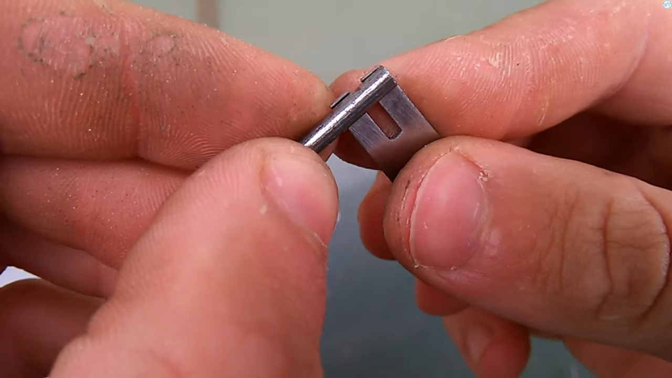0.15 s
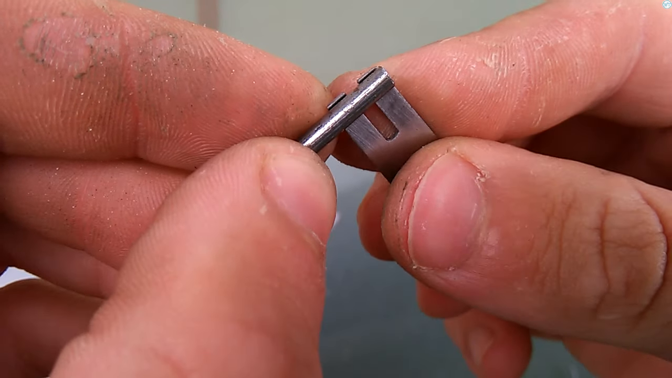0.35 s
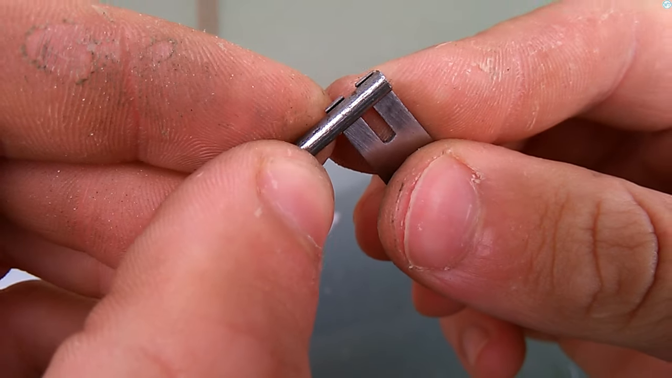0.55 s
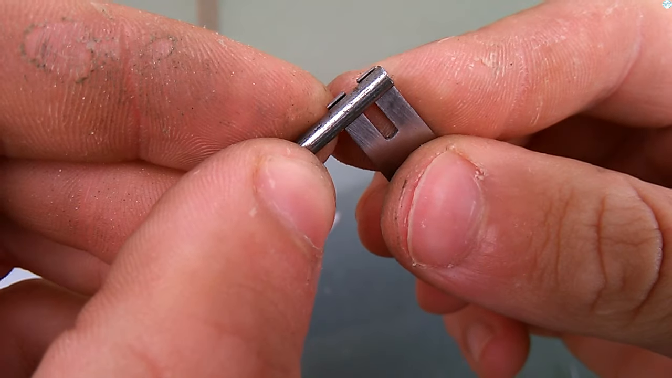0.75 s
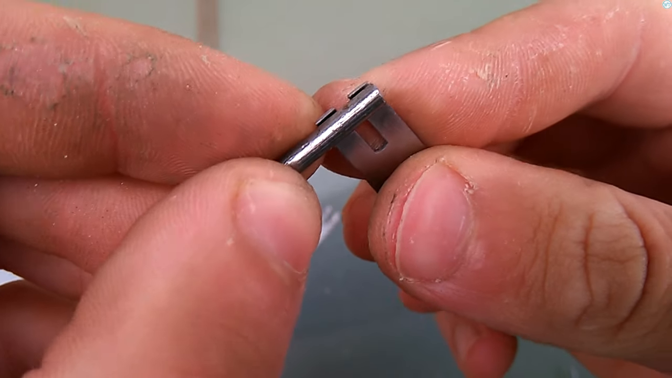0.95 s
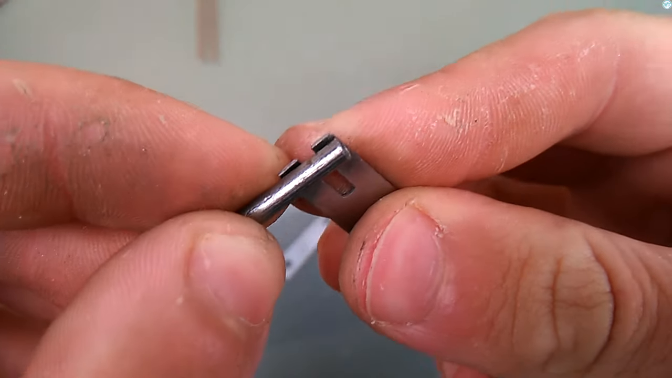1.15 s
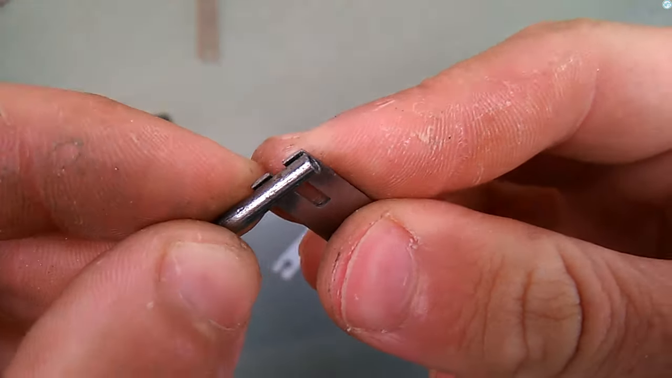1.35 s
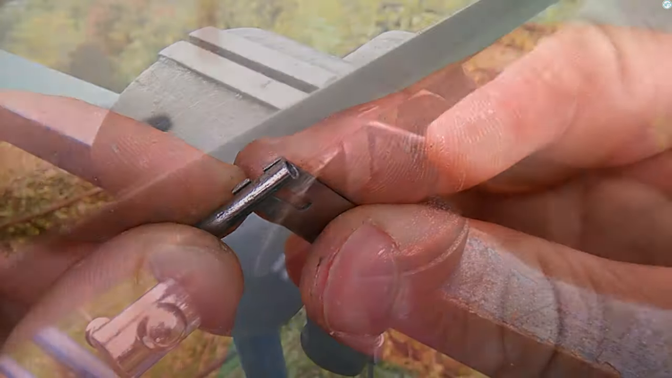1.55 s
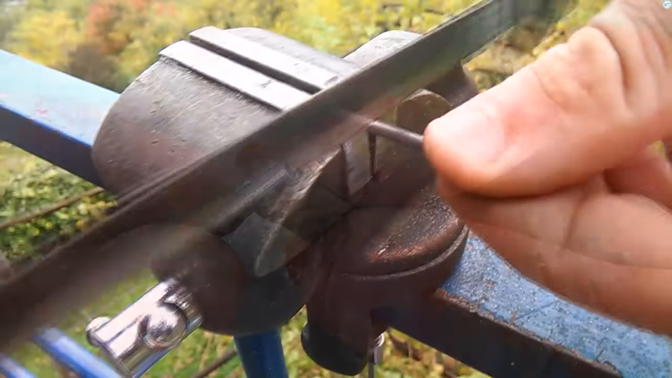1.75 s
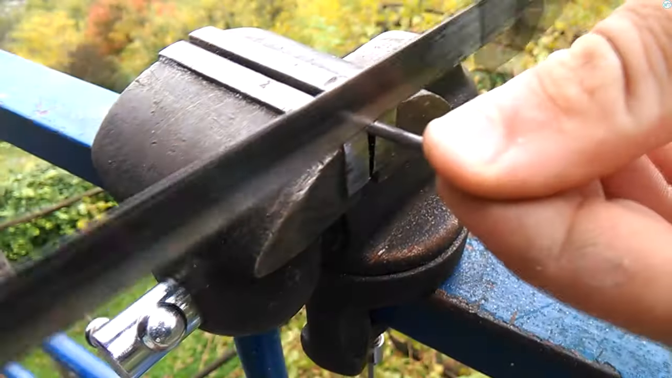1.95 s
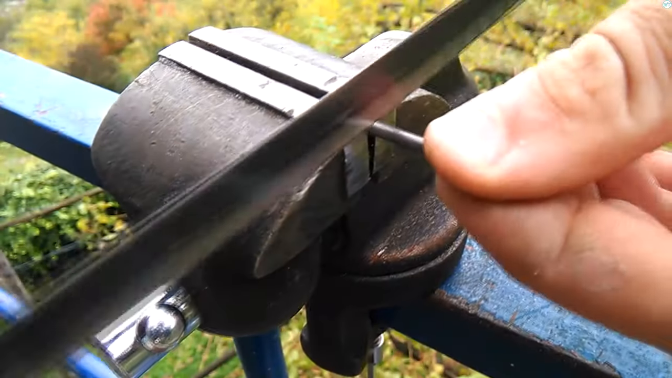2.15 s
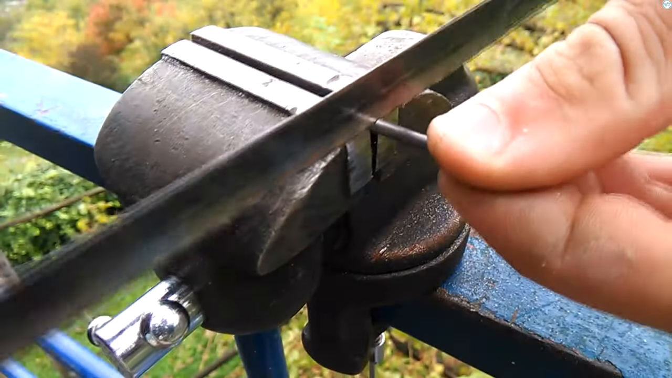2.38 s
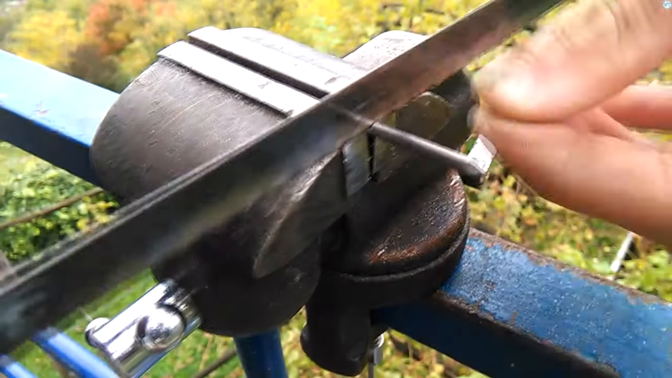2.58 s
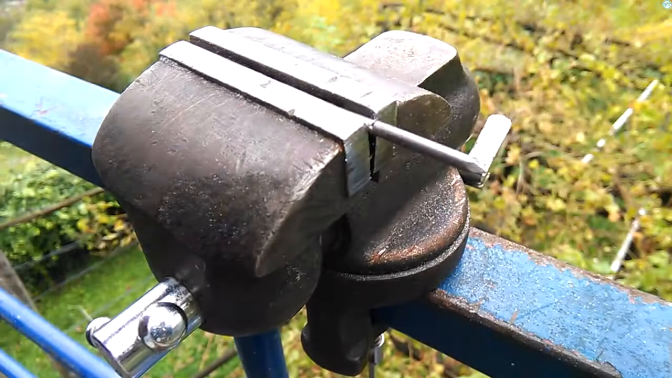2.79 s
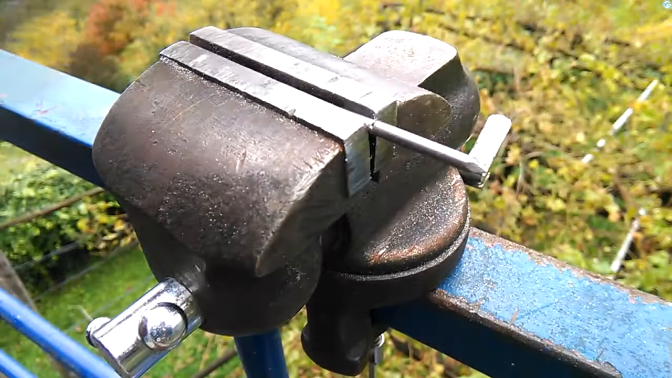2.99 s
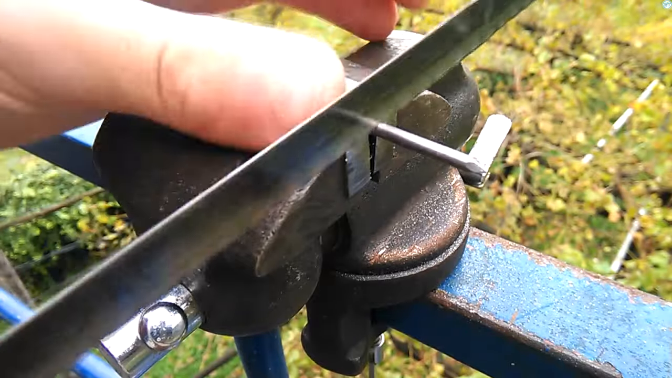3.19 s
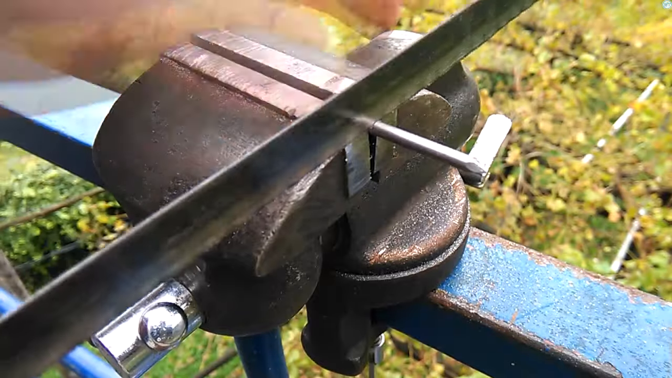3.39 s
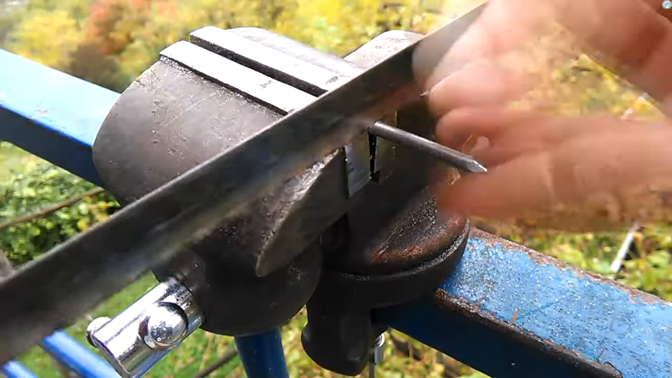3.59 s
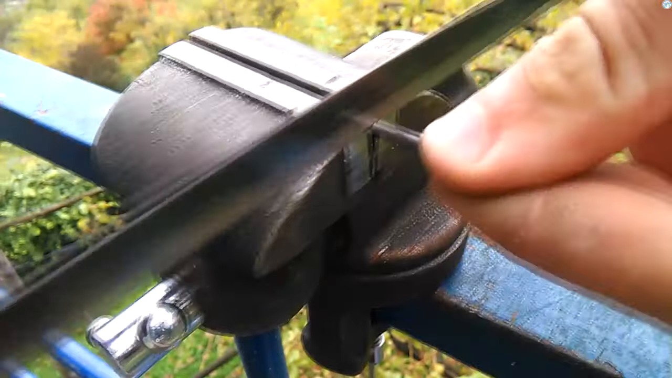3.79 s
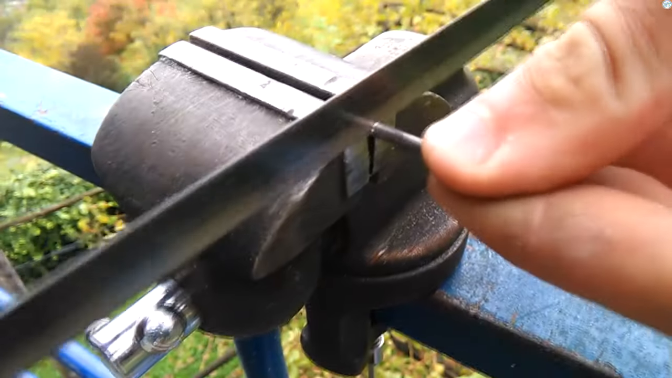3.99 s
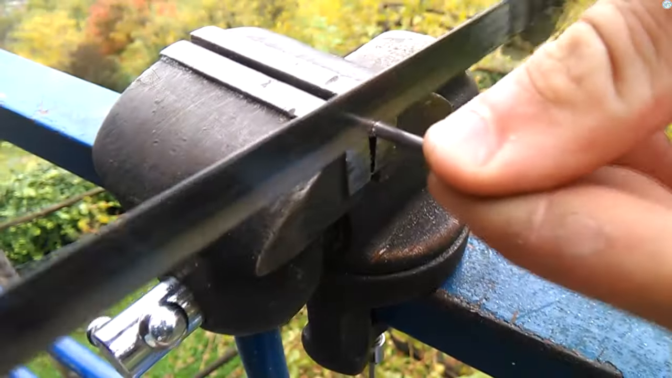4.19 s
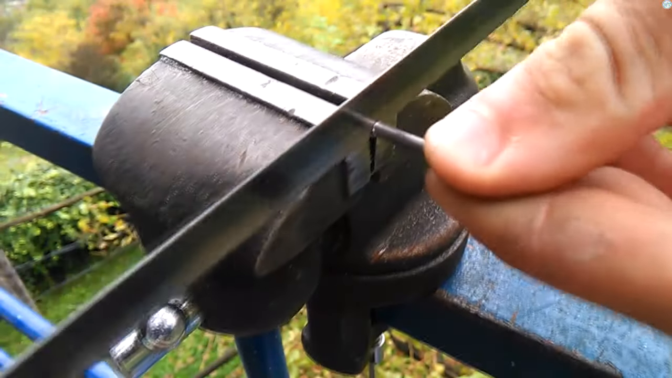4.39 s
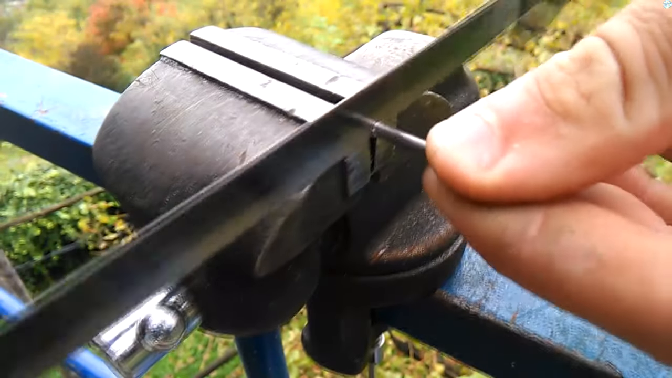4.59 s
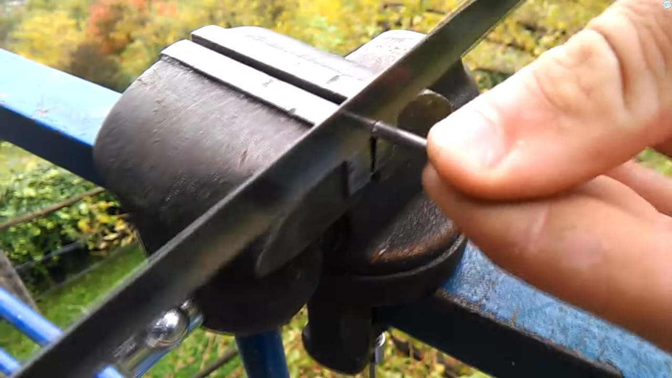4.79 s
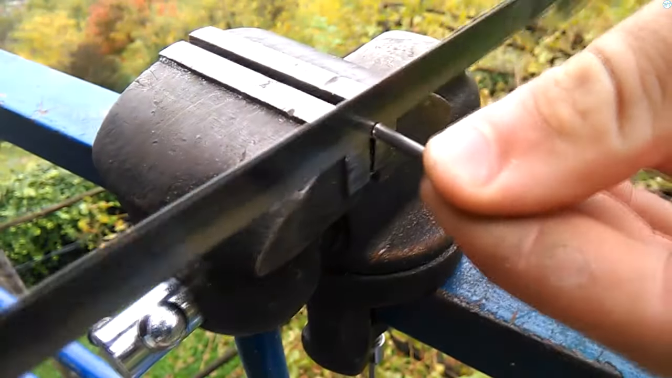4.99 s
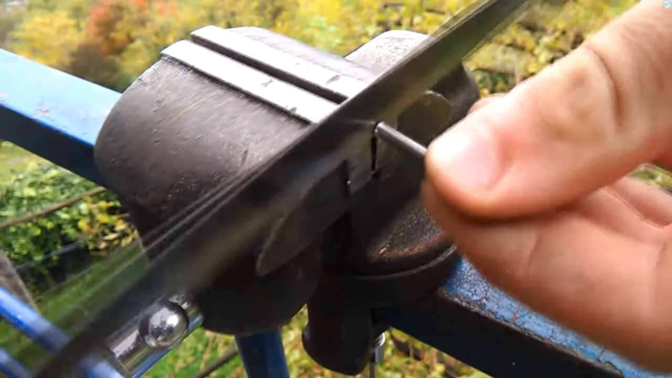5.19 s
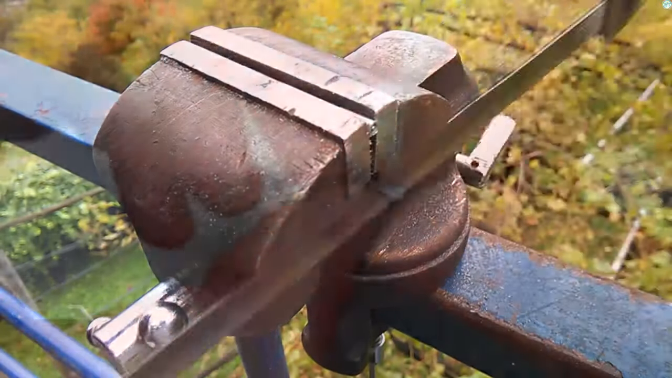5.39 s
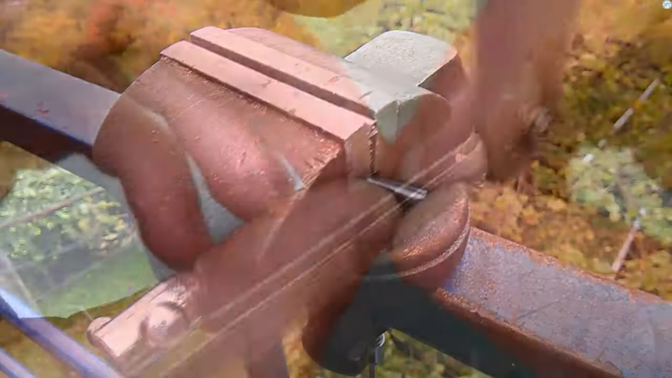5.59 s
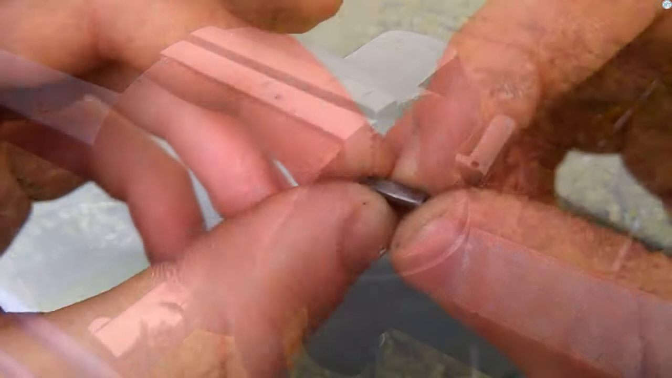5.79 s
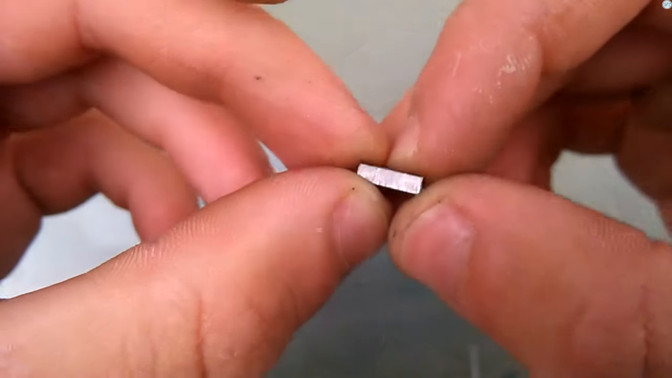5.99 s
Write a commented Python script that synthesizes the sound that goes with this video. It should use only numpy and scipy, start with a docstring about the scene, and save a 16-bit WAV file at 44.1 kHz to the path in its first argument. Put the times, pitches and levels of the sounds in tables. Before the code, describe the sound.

Quick hacksaw strokes scrape a steel rod in a vise, pause for light ticks, then resume longer and end in sharp metallic snags.

```python
"""A hacksaw cuts a thin steel rod in a bench vise. Air rumbles faintly on the microphone throughout, and a
low hum comes and goes. Then short, fast strokes begin, seven or eight to and fro a second: the impacts
of the teeth force blade, rod, vise and bench to vibrate. Light touches of steel follow, with one lone
stroke and a knock among them. In a longer second bout the bench knocks again and the blade snags as the
rod parts. Last come a dull knock and the stick-slip squeak of a fingertip."""
import sys
import numpy as np
from scipy import signal
from scipy.fft import rfft, irfft, next_fast_len
from scipy.io import wavfile
from scipy.ndimage import map_coordinates

SR = 44100
rng = np.random.default_rng(int(sys.argv[2]) if len(sys.argv) > 2 else 0)


def store_wav(level_fs):
    """Save 16-bit WAV to argv[1]."""
    pcm = np.round(np.clip(np.atleast_2d(level_fs), -1, 1) * 32767)
    wavfile.write(sys.argv[1], SR, pcm.T.astype(np.int16))


N = 266805


def amp(db):
    """Amplitude ratio of a level in decibels."""
    return 10 ** (np.asarray(db) / 20)


def unit(x):
    """Normalisation to rms 1."""
    return x / np.sqrt(np.mean(x ** 2) + 1e-20)


def at_level(sound, db, size):
    """Normalisation to the energy of size samples at this rms level."""
    return amp(db) * sound * np.sqrt(size / np.sum(sound ** 2))


def along(points, hz):
    """Interpolation of (f/Hz, value) points on a logarithmic frequency axis."""
    f, values = np.transpose(points)
    return np.interp(np.log(hz + 1), np.log(f + 1), values)


def read(rows, t):
    """Linear interpolation of every column of (t/s, ...) rows at time t."""
    times, *columns = np.transpose(rows)
    return [np.interp(t, times, column) for column in columns]


def curve(rows):
    """Envelope of (t/s, value) rows, one value per sample."""
    return read(rows, np.arange(N) / SR)[0]


def wobble(rate, size):
    """Smooth random modulation: a spline through rate knots a second."""
    knots = rng.standard_normal(int(size * rate / SR) + 4)
    return map_coordinates(knots, [np.arange(size) * rate / SR], mode="nearest")


def filtered(x, response):
    """Linear filtering by a complex frequency response, padded for the tail."""
    size = next_fast_len(len(x) + SR // 4)
    return irfft(rfft(x, size) * response(np.fft.rfftfreq(size, 1 / SR)), size)


def causal(gain):
    """Minimum-phase response of this gain: it rings only after a blow."""
    cepstrum = irfft(np.log(np.maximum(gain, 1e-6)))
    half = len(cepstrum) // 2
    return np.exp(rfft(cepstrum * np.r_[1, np.full(half - 1, 2), 1, np.zeros(half - 1)]))


def resonance(f, hz, width):
    """Response of a damped oscillator, with gain 1 at its centre."""
    return 1j * f * width / (hz * hz - f * f + 1j * f * width)


def noise(spectrum):
    """Stationary noise of this spectral shape, rms 1."""
    return unit(filtered(rng.standard_normal(N), lambda f: amp(along(spectrum, f)))[:N])


def dying_noise(decay):
    """Frequency-dependent damping: a noise burst of energy 1 decays exponentially in each band."""
    hz, t, bands = signal.stft(rng.standard_normal(SR // 2), SR, nperseg=128)
    tail = signal.istft(bands * np.exp(-np.log(1000) * t / along(decay, hz)[:, None]), SR)[1]
    return tail / np.linalg.norm(tail)


def add(track, start, sound):
    """Superposition of a sound on the track from start/s."""
    part = track[max(round(start * SR), 0):][:len(sound)]
    part += sound[:len(part)]


# Strength of the air flow: t/s, relative level/dB
WIND_LEVEL = [(0.0, -56.5), (1.58, -63), (2.04, -51), (2.59, -61), (2.63, -50), (2.96, -66), (3.67, -63),
              (4.08, -44), (4.43, -57), (4.89, -47), (5.46, -58), (6.05, -55)]
# Spectrum of its rumble: f/Hz, spectral level/dB
WIND_SPECTRUM = [(12, -3), (28, 0), (45, -6), (70, -13), (100, -28), (250, -45), (600, -120)]


def wind():
    """Pressure fluctuations of air moving over the microphone make a low rumble."""
    return amp(curve(WIND_LEVEL) + 3.5) * noise(WIND_SPECTRUM)


# Loudness of the surroundings: t/s, level/dB
AMBIENT_LEVEL = [(0, -57.5), (.6, -57.5), (1.5, -60), (3, -66), (3.7, -67), (5.5, -60), (6.05, -60)]
# Spectra of their dull murmur and of the hiss: f/Hz, spectral level/dB
MURMUR_SPECTRUM = [(30, -12), (70, 0), (130, -1), (220, -5), (300, -13), (400, -12), (520, -18),
                   (700, -20.5), (950, -19.5), (1200, -27), (2000, -34), (4000, -44), (8000, -62)]
HISS_SPECTRUM = [(300, 9), (1000, 8), (2000, 3), (3500, -1), (8000, -3), (12000, -5), (16000, -8)]


def ambience():
    """Amplitude-modulated noise: a dull murmur, and a faint hiss that partly follows its level."""
    level_db = curve(AMBIENT_LEVEL)
    murmur = amp(level_db + .7 * wobble(11, N)) * noise(MURMUR_SPECTRUM)
    hiss = amp(-77 + .35 * (level_db - level_db.mean())) * noise(HISS_SPECTRUM)
    return murmur + hiss


# Swell of the hum: t/s, level/dB
HUM_LEVEL = [(.2, -80), (.3, -60), (.45, -56), (.62, -56), (.72, -80)]


def hum(hz=88):
    """A brief low tone wavers by slight phase modulation."""
    phase = 2 * np.pi * hz * np.arange(N) / SR + .3 * wobble(7.3, N)
    return amp(curve(HUM_LEVEL)) * unit(np.sin(phase))


def teeth(speed, tooth_hz, jitter, scatter_db):
    """Impulse train: each tooth strikes the rod once, at a rate proportional to the blade's speed."""
    passed = np.cumsum(speed) * tooth_hz / SR
    count = int(passed[-1])
    offset, strength = rng.standard_normal((count, 2)).T
    hits = np.searchsorted(passed, np.arange(count) + .5 + jitter * offset)
    return unit(np.bincount(np.minimum(hits, len(speed) - 1), amp(scatter_db * strength), len(speed)))


def tearing(blows, decay_s=.0011):
    """Impact-modulated noise: after each blow a chip tears off in a short hiss."""
    envelope = signal.lfilter([1], [1, -np.exp(-1 / (decay_s * SR))], blows)
    return unit((unit(envelope) + .56) * rng.standard_normal(len(blows)))


# Modes of saw, rod and vise: f/Hz, bandwidth/Hz, level/dB over the plain scrape
STEEL_MODES = [(1135, 40, 6), (1320, 40, 3), (1708, 50, 3), (1877, 28, 6), (2187, 35, 4), (2650, 40, 8),
               (2810, 80, 5.5), (3575, 40, 7), (4221, 65, 6), (4730, 30, 7), (4815, 50, 5), (5213, 45, 6),
               (5750, 75, 8), (6755, 45, 3), (7743, 35, 7), (8085, 85, 10.5), (8483, 50, 7), (9016, 30, 8)]


def steel_response(size, lead_hz, lead_db=8.5, vary_db=2):
    """Modal coupling depends on the contact point: each stroke weights the modes anew and adds a lead."""
    f = np.fft.rfftfreq(next_fast_len(size + SR // 4), 1 / SR)
    power = sum(amp(db + vary_db * rng.standard_normal()) ** 2 / (1 + (2 * (f - hz) / width) ** 2)
                for hz, width, db in STEEL_MODES + [(lead_hz, 70, lead_db)])
    return causal(np.sqrt(1 + power))


# Modes of the rod held between vise and fingers: f/Hz, relative level/dB
ROD_MODES = [(575, -1.5), (688, 2.5), (790, -9), (950, -5)]


def rod_ring(drive, vary_db=5.5):
    """Forced vibration: the rod sings in its modes, whose strengths vary from stroke to stroke."""
    modes = [(hz, amp(db + vary_db * rng.standard_normal())) for hz, db in ROD_MODES]
    return filtered(drive, lambda f: sum(gain * resonance(f, hz, 55) * resonance(f, hz, 300)
                                         for hz, gain in modes))


def squeal(drive, hz=7560):
    """A sharp resonance selects one high pitch from the noise of the cut."""
    return filtered(drive, lambda f: resonance(f, hz, 36) * resonance(f, hz, 400))


def cutting_force(speed, skid_db, catch_s=.018, scatter_s=.003, snap_s=.0015):
    """Saturating friction: the force levels off with speed; the teeth skid at first, then catch."""
    t = np.arange(len(speed)) / SR
    caught_at = catch_s + scatter_s * rng.standard_normal()
    skidding = (1 - np.tanh((t - caught_at) / snap_s)) / 2
    cutting = np.tanh(.9 * speed ** 1.24)
    pressing = .078 * speed ** .26  # the blade still bears on the rod as it turns
    return (cutting + pressing) * amp(1.3 * wobble(170, len(speed)) + skid_db * skidding)


# Spectra of tearing steel, biting teeth and droning bench: f/Hz, spectral level/dB
RASP_SPECTRUM = [(1290, -34), (2200, -5), (2430, -4.5), (2730, -5.5), (3110, -10), (4120, -6), (5360, -5.5),
                 (5730, -2.5), (7160, -5.5), (7340, -10), (7840, -5), (9870, -12), (12400, -16.5),
                 (15800, -27.5)]
BITE_SPECTRUM = [(500, -39), (900, -2), (1200, 0), (1700, 0), (2300, 0.5), (2800, -7.5), (3300, -18.5),
                 (5000, -38)]
BENCH_SPECTRUM = [(60, -20.5), (105, 2), (135, 5.5), (165, -5), (200, -3.5), (260, -7), (375, -2),
                  (460, -8.5), (570, -5), (800, -15.5), (1800, -30.5)]


def stroke(length, pull, lead_hz, level_db, bite_db, rod_db, bench_db):
    """Source and filter: blows and chips drive the steel; a push squeals more, a pull rings the rod."""
    size = round(length * SR)
    skew = .93 if pull else 1.05  # over 1, the speed peaks late
    speed = np.sin(np.pi * ((np.arange(size) + .5) / size) ** skew)
    force = cutting_force(speed, skid_db=1 if pull else -2.5)
    blows = teeth(speed, tooth_hz=1700 * amp(1.3 * rng.standard_normal()), jitter=.19, scatter_db=2)
    chips = tearing(blows)
    steel = steel_response(size, lead_hz)

    def through_steel(drive, spectrum):
        return filtered(drive, lambda f: causal(amp(along(spectrum, f))) * steel)

    rasp = through_steel(force * (chips + .5 * blows), RASP_SPECTRUM)
    bite_force = force * speed ** (.1 if pull else .24)  # grows more steeply with speed than the rasp
    bite = through_steel(bite_force * (blows + .5 * chips), BITE_SPECTRUM)
    squeal_db = (-17 if pull else -10.5) + 3.5 * rng.standard_normal()
    # the blows shake the rod most in mid-stroke, and the bench right up to the turns
    judder = speed ** .32 * (blows - blows.mean() + .72 * chips)
    layers = [(rasp, 0), (bite, bite_db), (squeal(force * chips), squeal_db),
              (rod_ring(speed * judder), rod_db + (2 if pull else -1)),
              (through_steel(judder, BENCH_SPECTRUM), bench_db)]
    return sum(at_level(sound, level_db + over_rasp_db, size) for sound, over_rasp_db in layers)


# Reversals of the blade in each bout: t/s
FIRST_TURNS = [1.590, 1.643, 1.715, 1.762, 1.829, 1.886, 1.943, 1.995, 2.057, 2.110, 2.175, 2.232, 2.297,
               2.363]
LONE_TURNS = [2.591, 2.650]
LAST_TURNS = [3.795, 3.845, 3.918, 3.991, 4.061, 4.137, 4.204, 4.268, 4.341, 4.411, 4.487, 4.550, 4.623,
              4.688, 4.760, 4.831, 4.896, 4.968, 5.035, 5.107, 5.178, 5.253, 5.341, 5.410, 5.452]
# Bouts: reversals, first direction, leading blade mode on the push f/Hz, rod base level/dB over the rasp
SAW_BOUTS = [(FIRST_TURNS, "push", 2800, -15.5), (LONE_TURNS, "push", 1000, -26),
             (LAST_TURNS, "pull", 1680, -18)]
# Pressure of the arm, which eases as the rod parts: t/s, rasp level/dB
ARM_PRESSURE = [(1.61, -47), (1.68, -42), (1.74, -43), (1.8, -38.5), (1.91, -37), (2.08, -32),
                (2.26, -35.5), (2.33, -32), (2.62, -30.5), (3.82, -38), (3.88, -32), (4.3, -29.5),
                (4.95, -32.5), (5.3, -33.5), (5.375, -37.5), (5.43, -51.5)]
# Balance against the rasp: t/s, bite level/dB, bench level/dB
STROKE_BALANCE = [(1.6, -5, -12), (2.0, -9, -15), (2.25, -7, -15.5), (2.62, -3.5, -17.5), (3.9, -3.5, -11),
                  (4.2, -4, -13.5), (4.55, -5.5, -17.5), (5.25, -6, -14.5), (5.42, -11.5, -15)]


def saw(pull_lead_hz=2743, overrun_s=.003):
    """Reciprocating motion: push and pull alternate, each scraping slightly past its turns."""
    out = np.zeros(N)
    for turns, first_way, push_lead_hz, rod_db in SAW_BOUTS:
        pull = first_way == "pull"
        for start, end in zip(turns, turns[1:]):
            level_db, = read(ARM_PRESSURE, (start + end) / 2)
            bite_db, bench_db = read(STROKE_BALANCE, (start + end) / 2)
            if pull:  # drawn back, the teeth skate and bite less
                level_db -= .1
                bite_db -= 2
            lead_hz = (pull_lead_hz if pull else push_lead_hz) * np.exp(.03 * rng.standard_normal())
            sound = stroke(end - start + 2 * overrun_s, pull, lead_hz, level_db, bite_db, rod_db, bench_db)
            add(out, start - overrun_s, with_room(sound, wet_db=-9.5))
            pull = not pull
    return out


# Reverberation time of the surroundings: f/Hz, T60/s
ROOM_DECAY = [(130, 0.47), (400, 0.085), (900, 0.1), (2000, 0.093), (10000, 0.031)]


def with_room(sound, wet_db):
    """Reverberation: reflections from nearby things follow the direct sound after 5 ms."""
    reflections = signal.fftconvolve(np.pad(sound, (SR // 200, 0)), dying_noise(ROOM_DECAY))
    return np.pad(sound, (0, len(reflections) - len(sound))) + amp(wet_db) * reflections


# Touches of steel, and snags as the rod parts: t/s, level/dB, contact spread/s, scrape centre f/Hz
TOUCH_EVENTS = [(2.468, -69, .011, 6800), (2.549, -65, 0.003, 7150), (2.702, -66.5, .005, 7060),
                (2.819, -50.5, .014, 6550), (2.851, -68, .08, 8600), (3.225, -68.5, 0.011, 7400),
                (3.291, -62, .012, 3800), (3.386, -65.5, .006, 7000), (3.400, -58, 0.0036, 7300),
                (3.60, -68, .006, 5450), (3.615, -60, .008, 7060), (5.32, -31, .007, 7020),
                (5.349, -31, .009, 7200), (5.377, -36.5, .004, 6830), (5.438, -50.5, .011, 4270),
                (5.497, -50.5, .009, 5230), (5.614, -57.5, .007, 2510)]
# Modes that a touch excites: f/Hz, relative level/dB, T60/s
TOUCH_MODES = [(1803, -1.5, .045), (2490, 2.5, .17), (2830, -5, .08), (3700, -11, .06), (4231, -3, .09),
               (5800, -10, .04), (7079, -10, .04), (7558, -2, .15), (8060, -8, .04)]


def touches():
    """Free vibration: blade and fingers brush the rod, exciting most the modes near the scrape's centre."""
    def ringing(f):
        return sum(amp(db + 3.5 * rng.standard_normal()) * resonance(f, hz, np.log(1000) / (np.pi * t60))
                   for hz, db, t60 in TOUCH_MODES)

    out, t = np.zeros(N), np.arange(SR // 4) / SR
    for start, db, spread, scrape_hz in TOUCH_EVENTS:
        envelope = (t / spread) ** 2 * np.exp(-2.6 * t / spread)
        contact = envelope * rng.standard_normal(len(t)) * amp(3.5 * wobble(550, len(t)))
        sound = filtered(contact, lambda f: (ringing(f) + amp(-18)) * resonance(f, scrape_hz, 5000))
        add(out, start - .003, with_room(at_level(sound, db, .009 * SR), wet_db=-10))
    return out


# Dull blows on the bench: t/s, level/dB
KNOCK_EVENTS = [(2.634, -36), (3.821, -34.5), (3.982, -31.5), (4.124, -32.5), (5.612, -38.5)]
# Spectrum of a blow: f/Hz, spectral level/dB
KNOCK_SPECTRUM = [(60, -27.5), (130, -8.5), (250, -8), (390, 1), (480, -15), (600, -3), (820, -18),
                  (1350, -19), (2200, -13.5), (7000, -22.5), (9300, -19.5), (15000, -47)]
# Its damping: f/Hz, T60/s
KNOCK_DAMPING = [(150, 0.23), (600, .12), (1500, 0.062), (10000, 0.052)]


def knocks(impacts=3, flight_s=.009, loss_db=8.5):
    """Inelastic impact: each blow bounces quickly and loses energy; its lows last longest."""
    out = np.zeros(N)
    for start, db in KNOCK_EVENTS:
        for bounce in range(impacts):
            thud = filtered(dying_noise(KNOCK_DAMPING), lambda f: causal(amp(along(KNOCK_SPECTRUM, f))))
            thud = at_level(thud, db - bounce * loss_db, .0062 * SR)
            add(out, start + bounce * flight_s, with_room(thud, wet_db=-10.5))
    return out


# A fingertip slipping on steel: t/s, f/Hz, relative level/dB
FINGER_SLIP = [(5.749, 1775, -81), (5.765, 1985, -67), (5.78, 2190, -71), (5.80, 2620, -77),
               (5.815, 2720, -90)]


def squeak():
    """Stick-slip oscillation: skin grips and lets go ever faster, in a faint, rough, rising tone."""
    t = np.arange(FINGER_SLIP[0][0], FINGER_SLIP[-1][0], 1 / SR)
    hz, db = read(FINGER_SLIP, t)
    phase = 2 * np.pi * np.cumsum(hz * amp(1.3 * wobble(2500, len(t)))) / SR
    tone = unit(np.sin(phase) + .42 * np.sin(2 * phase) + .41 * np.sin(3 * phase))
    out = np.zeros(N)
    add(out, t[0], amp(db + .5) * tone)
    return out


def scene():
    """Superposition of a quiet background and the work close by, in one channel."""
    return (wind() + ambience() + hum() + saw() + touches() + knocks() + squeak())[None]


def record(dry):
    """Band limiting: an ideal low-pass filter removes the highest treble."""
    cutoff_hz = 15950
    return filtered(dry[0], lambda f: f < cutoff_hz)[None, :N]


dry = scene()
out = record(dry)
store_wav(out)
```